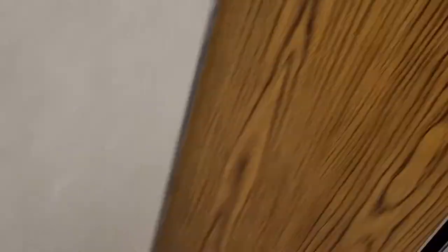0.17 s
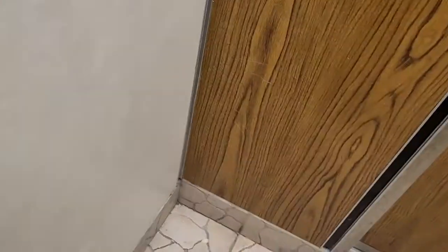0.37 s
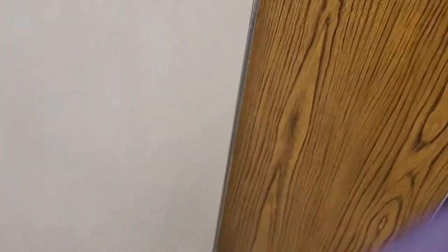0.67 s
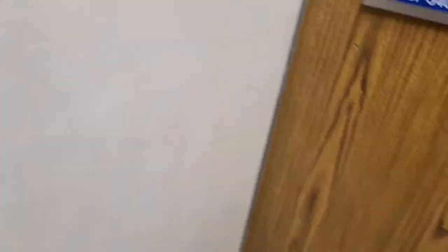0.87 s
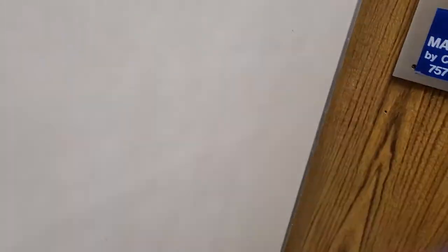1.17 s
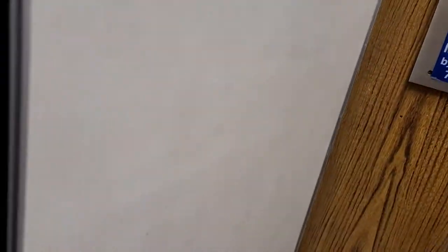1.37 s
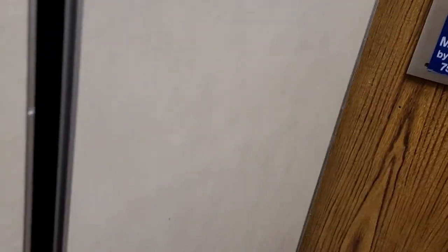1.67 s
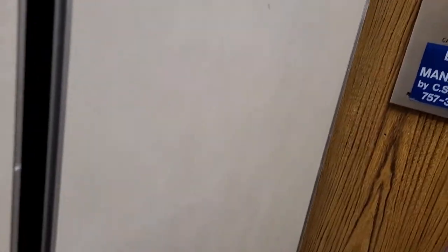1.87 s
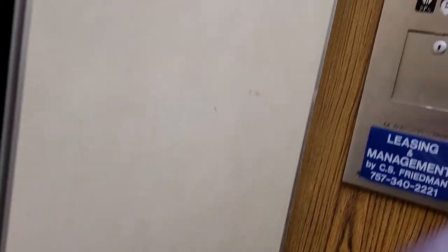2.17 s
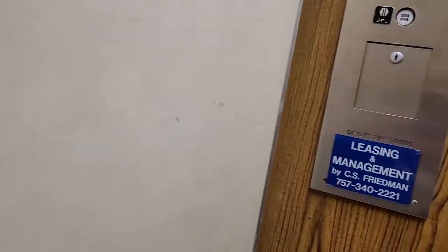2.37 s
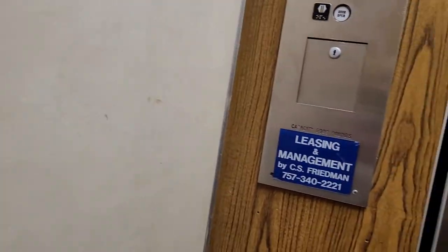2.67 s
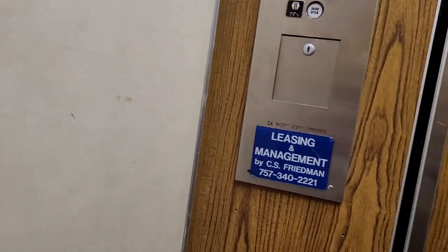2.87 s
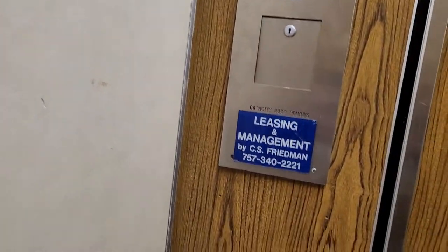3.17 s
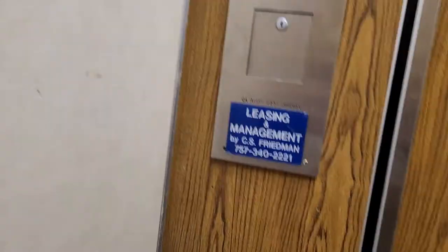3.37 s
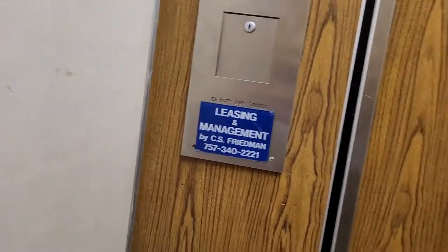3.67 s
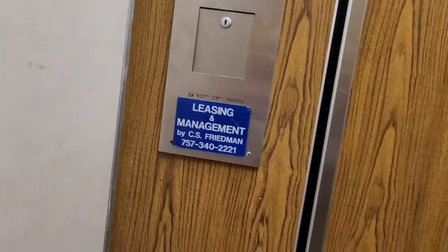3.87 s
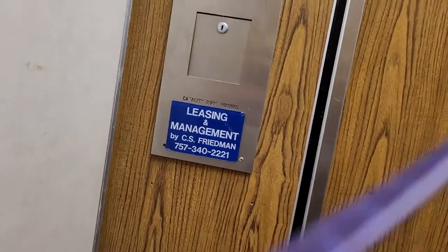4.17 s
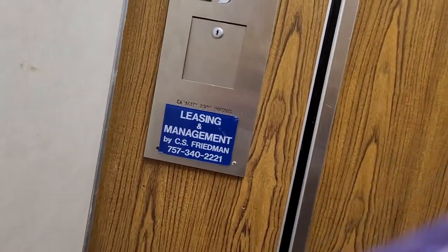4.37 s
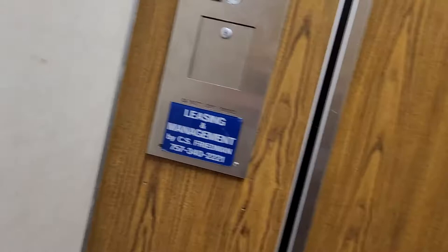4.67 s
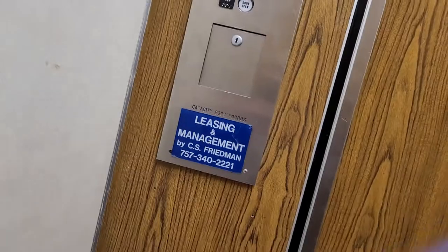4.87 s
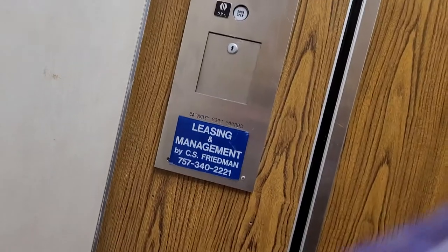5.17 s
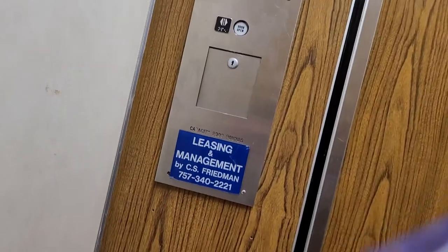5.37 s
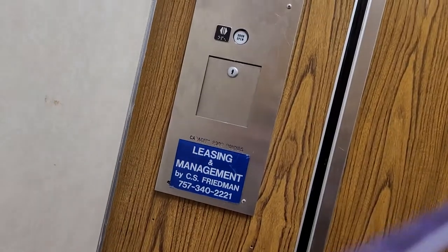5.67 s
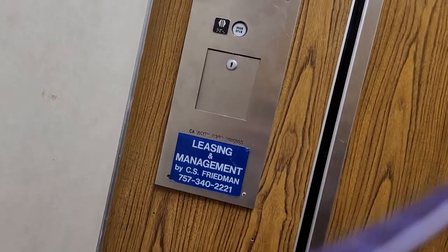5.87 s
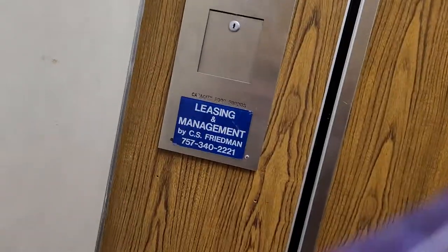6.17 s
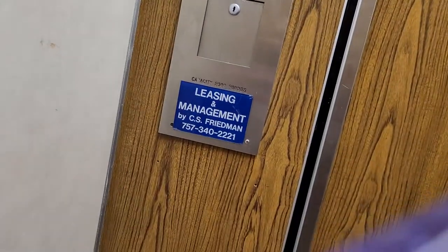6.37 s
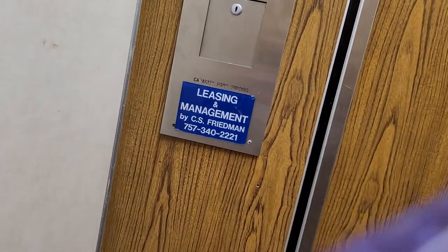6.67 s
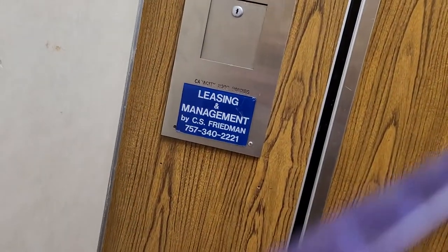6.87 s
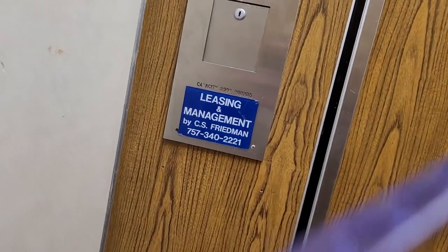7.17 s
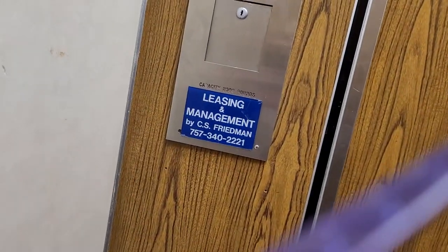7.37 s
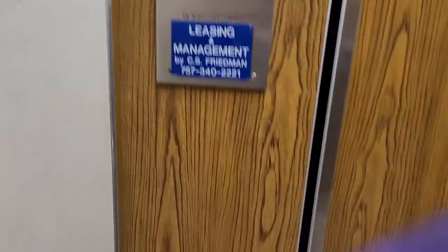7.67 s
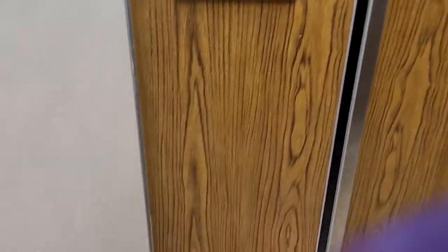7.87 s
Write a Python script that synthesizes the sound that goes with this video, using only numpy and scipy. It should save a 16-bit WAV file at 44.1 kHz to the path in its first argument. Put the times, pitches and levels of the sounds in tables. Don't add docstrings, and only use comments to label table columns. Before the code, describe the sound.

A lift door closes within arm's reach: rough low rumble, scraping, bright clicks and boxy thuds, with a dry squeaking roller. The clatter is busiest in the first two and a half seconds, ends with a firm knock, then rolls out in small bumps and ticks. A long quiet stretch holds only low hum and tiny taps before a fast toothed catch zips close to the left. Stereo phone, short boxy echo, strap rustle.

```python
import sys
import numpy as np
from scipy import signal
from scipy.fft import rfft, irfft
from scipy.io import wavfile
from scipy.ndimage import uniform_filter1d

SR = 44100
rng = np.random.default_rng(int(sys.argv[2]) if len(sys.argv) > 2 else 0)


def wrap_up_sound(samples):
    columns = np.atleast_2d(samples).T
    tamed = np.clip(columns, -1, 1)
    steps = np.round(tamed * 32767).astype(np.int16)
    wavfile.write(sys.argv[1], SR, steps)


def gain_from_db(level_db):
    decades = np.asarray(level_db, float) / 20
    return 10 ** decades


N = 353682


def band(x, lo_hz, hi_hz, order=2):
    return signal.sosfilt(signal.butter(order, [lo_hz, min(hi_hz, .45 * SR)], "bandpass", fs=SR, output="sos"), x)


def unit(x):
    return x / np.sqrt(np.mean(x ** 2))


def ring(x, hz, t60):
    pole = np.exp(2j * np.pi * hz / SR - np.log(1000) / (max(t60, .01) * SR))
    return signal.lfilter([1], [1, -pole], x).imag


def walk(rate):
    k = int(SR / rate)
    steps = np.repeat(rng.standard_normal(N // k + 1), k)
    return unit(uniform_filter1d(uniform_filter1d(steps, k), k)[:N])


def coloured(points, channels=2):
    hz, db = np.transpose(points)
    gain = gain_from_db(np.interp(np.log(np.fft.rfftfreq(N, 1 / SR) + 1), np.log(hz), db))
    return unit(irfft(rfft(rng.standard_normal((channels, N))) * gain, N))


def curve(table):
    s, db = np.transpose(table)
    return gain_from_db(np.interp(np.arange(N) / SR, s, db))


def swells(s, db, rise, fall):
    t = np.linspace(0, N / SR, num=4096)[:, None]
    climb = (s - t) / np.maximum(rise, .01)
    sink = (t - s) / np.maximum(fall, .01)
    gain = gain_from_db(db - 20 * np.maximum(climb, sink)).sum(axis=1)
    return np.interp(np.arange(N) / SR, t[:, 0], gain)


def evened(x):
    spectrum = rfft(x)
    power = uniform_filter1d(np.abs(spectrum) ** 2, size=5)
    return irfft(spectrum / np.sqrt(power), x.shape[-1])


def add(out, s, sound):
    i = int(s * SR)
    out[..., i:i + sound.shape[-1]] += sound[..., :N - i]


def ports(mid, side):
    return np.array([mid + side, mid - side])


def panned(sound, db, pan_db):
    return gain_from_db(db + np.array([[pan_db], [-pan_db]]) / 2) * sound


def motor_hum():
    # line in Hz, level in dB rms.
    hum_lines = [(59, -83), (119, -76.5), (177, -78.5), (240, -80.5), (283, -81.5)]
    # frequency in Hz, density in dB per Hz.
    still_air = [(15, -31), (25, 2.5), (97, -14), (134, 5), (212, -6.5), (270, -0.5), (516, -21),
                 (714, -20), (1100, -38), (1330, -49), (8360, -38), (14800, -40), (16000, -43.5)]
    t = np.arange(N) / SR
    hum = np.zeros(N)
    for hz, db in hum_lines:
        level = gain_from_db(db + 4 + 1.8 * walk(6.7))
        hum += level * np.sin(2 * np.pi * hz * t + 0.54 * walk(3.3))
    return ports(hum, .2 * hum) + gain_from_db(-73.5) * coloured(still_air)


def strap():
    # peak in seconds, peak level in dB, seconds to rise 20 dB, seconds to fall 20 dB.
    brushes = [(0, -70.5, .1, 0.7), (.62, -68, 0.33, 0.86), (1.38, -52.5, 0.04, 0.08), (1.52, -79, -1, 1),
               (1.83, -73.5, 0.2, 0.5), (2.01, -70.5, 0.3, 0.22), (2.389, -60.5, -0.09, .12),
               (3.1, -54.5, 0.07, -0.02), (3.46, -81.5, 0.33, 0.67), (4.51, -76, 0.32, 0.35),
               (4.97, -82, -0.4, -0.05), (5.3, -84, 0.37, 0.5), (5.46, -77.5, 0.46, 0.85),
               (6.25, -83.5, 0.6, 0.5), (7.21, -79, 0.3, 0.4), (7.774, -56.5, 0.1543, -0.14),
               (8.02, -71.5, 0.28, .1)]
    # frequency in Hz, density in dB per Hz.
    fabric = [(900, -27.5), (1600, -8.5), (2600, -12), (4200, -2.5), (6000, -3.5), (7300, 1), (9000, -6.5),
              (12500, -5.5), (16000, -11)]
    return swells(*np.transpose(brushes)) * gain_from_db(7 + 1.1 * walk(22)) * coloured(fabric)


def car_body(force):
    # frequency in Hz, level in dB, t60 in seconds.
    modes = [(118, -3.5, 0.91), (147.46, -8, 0.53), (179.4, -9, 0.44), (237.8, -7.5, 0.29), (266, -5, 0.25),
             (284.4, -3, 0.32), (308, -5.5, 0.24), (349.4, -6.5, 0.13), (393.3, -6.5, 0.14),
             (421.5, -8.5, 0.24), (468, -8, 0.15), (498.6, -9, 0.18), (557, -16.5, 0.48),
             (614, -15.5, 0.032)]
    rings = np.array([gain_from_db(db) * ring(force, hz, t60) for hz, db, t60 in modes])
    side_db = -15.5
    lean = gain_from_db(side_db) * (0.71 + np.array(modes)[:, 0] / 200 * (-1) ** np.arange(len(modes)))
    return ports(rings.sum(axis=0), lean @ rings)


def door_travel():
    # time in seconds, rumble in dB.
    travel = [(0, -37), (.24, -49.5), (.46, -73), (.76, -40), (1.14, -53.5), (1.25, -40), (1.6, -51.5),
              (2.1, -50), (2.52, -47), (2.9, -87), (3.0, -57.5), (3.42, -62.5), (4.05, -73), (4.3, -64.5),
              (4.87, -71), (6.1, -66.5), (6.8, -75.5), (8.02, -74.5)]
    # time in seconds, level in dB.
    sway = [
        (0, -58.5),
        (2.3, -55),
        (2.78, -60),
        (2.97, -70),
        (3.2, -56),
        (4.55, -68.5),
        (4.75, -76.5),
        (5.85, -85),
        (6.95, -72.5),
        (8.02, -80.5),
    ]
    # peak in seconds, rumble in dB, lurch relative to it in dB,
    # scrape relative to it in dB, seconds to fall 20 dB.
    shudders = [(.1, -51.5, -24, -19.5, 1), (.54, -52, -15, -13, 0.35), (1.364, -33.5, -14, -12, 0.0648),
                (1.631, -50, -14, -15.5, -0.8), (1.799, -31, -7, -17.5, 0.1558),
                (1.92, -37, -17, -30.5, 0.35), (2.391, -36, -20.5, -9, 0.01), (2.74, -59.5, -5, -32, 0.17),
                (3.089, -35.5, -4.5, -11, 0.0075), (3.6, -57.5, -13, -18, 0.21),
                (4.57, -62, -11, -15, 0.13), (5.65, -71, -12, -13, 0.36), (6.17, -74.5, -16, -13, 0.5),
                (7.62, -73.5, -14, 3, 0.3), (7.76, -63, -16, 10, 0.08), (7.99, -79.5, -14, 0, 1)]
    rise = 0.09
    pivot_db, scrape_rel_db, scrape_slope = -60, -21.5, 0.93
    effort = curve(travel)
    s, db, lurch_db, scrape_db, fall = np.transpose(shudders)
    rumble = effort + swells(s, db, rise, fall)
    deep = curve(sway) + swells(s, db + lurch_db, rise, fall)
    scrape = gain_from_db(pivot_db + scrape_rel_db) * (effort / gain_from_db(pivot_db)) ** scrape_slope
    scrape = scrape + swells(s, db + scrape_db, rise, fall)

    noise = rng.standard_normal((4, N))
    lumps = noise[2:] * gain_from_db(2.8 * walk(45))
    shake = 0.751 * car_body(lumps[0]) + 22 * ports(lumps[1], 0.82 * lumps[0])
    shake = rumble * unit(band(shake, 100, 480, order=3))
    lurch = ports(noise[0], -.2 * noise[0] + 0.2 * noise[1])
    lurch = deep * unit(band(lurch, 11.0, 62))
    grit = scrape * gain_from_db(2 * walk(30)) * unit(band(rng.standard_normal((2, N)), 320, 2000))
    return gain_from_db(-2.0) * shake + gain_from_db(2.5) * lurch + gain_from_db(5.5) * grit


def clicks():
    # start in seconds, treble peak in dB, middle relative to treble in dB,
    # top relative to treble in dB, rattle length in seconds.
    latches = [(0.0558, -29, -4.5, -15, 0.0029), (0.1288, -30, -3, -27.5, 0.0081),
               (0.4152, -26.5, -5.5, -16, 0.0032), (0.7037, -26.5, -4, -9.5, 0.0015),
               (1.201, -52.5, 1, -21.5, 0.0051), (1.214, -48, 6, -23, 0.014),
               (1.246, -44.5, 6, -20, 0.0029), (1.2582, -22, -4.5, -11, 0.0023),
               (1.342, -24.5, -14, -20, 0.0023), (1.3816, -29, 0.5, -24, 0.0075),
               (1.595, -52, 1.5, -4, 0.0095), (1.722, -29, -2.5, -22, 0.017),
               (1.777, -35.5, 5.5, -27, 0.0052), (1.961, -41, -20, -17, 0.0074),
               (2.1645, -50, 6, -12, 0.021), (2.268, -53.5, -10, -21, 0.013),
               (2.31, -37.5, 6.5, -36, 0.0095), (2.357, -42, 14, -8, 0.0093),
               (2.941, -52.5, -2.5, -30, 0.004), (2.9655, -46, -16, -5.5, 0.015),
               (3.014, -47, 0, -6, 0.0098), (3.039, -22, -6.5, -12, 0.0035), (3.079, -36, 6, -25, 0.018),
               (3.384, -56, 3.5, -17, 0.034), (4.552, -63.5, -5, -2, 0.0047), (7.583, -66.5, 7, -19, 0.009)]
    out, t = np.zeros((2, N)), np.arange(4096) / SR
    for s, db, mid_db, top_db, length in latches:
        ticks = rng.standard_normal((3, len(t))) * gain_from_db(4.06 * rng.exponential(size=len(t)))
        ticks[:, :12] *= 4
        ticks = evened(ticks * np.exp(-t / max(length, .0005)))
        ticks = ticks * np.exp(-t / max(3 * length, .002))
        ticks = ticks / np.sqrt(np.sum(ticks ** 2))
        treble = unit(band(ticks[0], 2160, 8440)) / 200
        middle = unit(band(ticks[1], 300, 2680)) / 200
        top = unit(band(ticks[2], 6170, 17000)) / 200
        tone = treble + gain_from_db(mid_db + 1) * middle + gain_from_db(top_db + 4.0) * top
        add(out, s, panned(tone, db + 25.0, 0.1))
    return out


def knocks():
    # start in seconds, peak in dB, centre in Hz, deep part relative in dB, push length in seconds.
    pushes = [(0.056, -40.5, 289, -29, 0.02), (0.136, -40.5, 283, -17, 0.015),
              (0.425, -30, 123, -10, 0.013), (0.469, -32, 367, -16, 0.017), (0.722, -21, 300, -23.5, 0.02),
              (0.724, -28.5, 413, -25, 0.022), (0.728, -23.5, 116.4, -25, 0.01),
              (0.979, -42, 109, -15, 0.0038), (1.162, -43, 300, -18.5, .02),
              (1.272, -28, 126, -19.5, 0.0088), (1.35, -34, 118, -20, 0.015),
              (1.394, -31.5, 118, -20.5, 0.01), (1.754, -29.5, 266, -9, 0.01),
              (1.789, -20.5, 179, -16, 0.025), (1.762, -28, 416, -20, .003), (1.781, -30.5, 400, -20, .004),
              (1.803, -28.5, 330, -20, .008), (1.81, -27, 125, -19, 0.012), (1.951, -32.5, 118, -19, 0.01),
              (2.204, -39, 283, -21, 0.0037), (2.31, -32, 110, -20, 0.0071),
              (2.372, -29, 206.5, -23, 0.014), (2.958, -34, 106, -8, 0.029),
              (3.048, -27.5, 340, -7.5, 0.01), (3.073, -36, 280, -12.5, 0.0081),
              (3.384, -36, 268, 3, 0.0047), (3.548, -42, 290, -20, .004), (3.591, -42.5, 290, -20, 0.0042),
              (3.694, -43, 291, -20, .004), (3.927, -45.5, 290, -20, .004), (4.262, -44, 300, -20, .004),
              (4.463, -47, 401, -20, .003), (4.789, -51, 242, -32, 0.0065), (7.74, -43, 242, -30, 0.01),
              (7.755, -51, 244, -40, 0.0036)]
    force, lurch, t = np.zeros(N), np.zeros(N), np.arange(8192) / SR
    for s, db, hz, deep_db, length in pushes:
        push = rng.standard_normal(len(t)) * np.exp(-t / max(length, .001))
        push = push / np.sqrt(np.sum(push ** 2))
        focus = band(push, hz / 1.17, hz * 1.116, order=1)
        focus = focus * 0.0044 * np.sqrt(hz / np.sum(focus ** 2))
        add(force, s, gain_from_db(db - 6.5) * (focus + 0.41 * push))
        add(lurch, s, gain_from_db(db + deep_db + 38.0) * band(push, 22, 70))
    return band(car_body(force), 110, 810, order=3) + ports(lurch, .2 * lurch)


def whine():
    # peak in seconds, peak level in dB, seconds to rise 20 dB, seconds to fall 20 dB, centre in Hz.
    squeals = [(.3, -76, .4, .2, 1985), (.93, -73, .1, .5, 2100), (1.0, -75, .3, .4, 2130),
               (1.08, -70, .25, .3, 2130), (1.16, -77, .3, .15, 2115), (1.46, -66, .17, .05, 2145),
               (1.79, -62, .12, .2, 2060), (1.97, -72, .4, .3, 2060), (2.171, -60, .01, .06, 1907),
               (2.47, -66, .25, .25, 2075), (2.58, -76, .3, .25, 2110), (2.68, -80, .3, .15, 2100),
               (2.86, -94, .2, .1, 2064), (3.4, -77, .02, .3, 2076), (3.55, -78, .2, .2, 2096)]
    s, db, rise, fall, hz = np.transpose(squeals)
    phase = 2 * np.pi * np.cumsum(np.interp(np.arange(N) / SR, s, hz)) / SR
    low = signal.butter(2, 60, fs=SR, output="sos")
    a = unit(signal.sosfilt(low, rng.standard_normal((2, N))))
    b = unit(signal.sosfilt(low, rng.standard_normal((2, N))))
    core = a * np.cos(phase) + b * np.sin(phase)
    halo = unit(band(rng.standard_normal((2, N)), 1950, 2330, order=3))
    return swells(s, db + 2, rise, fall) * (core + 0.7 * halo)


def track_ticks():
    # start in seconds, peak in dB, treble relative in dB, left minus right in dB.
    contacts = [(0.23, -48.5, 0, 1), (1.199, -50.5, -4, 0), (2.166, -42, -5, -9), (3.384, -48, -15.5, -8),
                (3.695, -45, -21, 2), (4.017, -64, -28.5, 0), (4.232, -44.5, -28, -5),
                (4.467, -43, -17.5, 1), (4.517, -44, -20, 2), (4.531, -52, -8, 0), (4.545, -59, -14, -2),
                (4.56, -44.5, -13.5, 2), (4.566, -52, -8, 0), (4.709, -56.5, -8.5, -5),
                (4.795, -47.5, -19.5, -6), (5.068, -59.5, -12.5, -13.5), (5.152, -60, -25, -3),
                (7.475, -74.5, -3, -7), (7.584, -57, -7, 2)]
    out, t = np.zeros((2, N)), np.arange(2048) / SR
    for s, db, treble_db, pan_db in contacts:
        blow = 0.65 * rng.standard_normal((2, len(t))) * np.exp(-t / 0.002)
        blow[:, 0] = 7
        thud = band(blow[0], 340, 870)
        edge = gain_from_db(treble_db - 1.5) * band(blow[1], 1100, 3700, order=1)
        add(out, s, panned(thud + edge, db + 6, pan_db))
    return out


def taps():
    # start in seconds, peak in dB, pitch in Hz, t60 in seconds.
    hollow_taps = [(2.311, -45, 3930, 0.09), (2.48, -73.5, 4050, 0.57), (2.937, -59, 3830, 0.24),
                   (2.957, -56.5, 3840, 0.21), (.986, -52.5, 680, 0.15), (5.069, -76.5, 1590, 0.38),
                   (5.088, -77, 1800, 0.15), (5.075, -78.5, 950, 0.22), (5.133, -67.5, 1000, 0.062),
                   (5.152, -60, 950, 0.031), (5.165, -75, 990, 0.17), (5.631, -70, 934, 0.14),
                   (5.934, -73, 680, .12), (6.038, -70.5, 1630, 0.23), (6.069, -73.5, 1180, 0.13),
                   (4.232, -65, 715, 0.83), (6.15, -72.5, 468, 0.73), (7.043, -82, 917, 0.072),
                   (7.381, -85, 970, .1), (7.481, -80, 980, 0.54), (7.585, -60, 2770, 0.14),
                   (7.701, -52, 930, 0.09), (7.736, -51, 925, 0.13), (7.805, -58, 910, 0.11)]
    spread_hz, scuff_db, scuff_fade_hz = 120, -4, 1700
    out, t = np.zeros(N), np.arange(SR // 2) / SR
    for s, db, hz, t60 in hollow_taps:
        noise = rng.standard_normal((2, len(t)))
        tap = unit(band(noise[0], hz - spread_hz, hz + spread_hz))
        scuff = unit(band(noise[1], hz / 1.8, hz * 1.2))
        tap = tap + gain_from_db(scuff_db) * min(scuff_fade_hz / hz, 1) ** 2 * scuff
        add(out, s, gain_from_db(db - 60 * t / max(t60, .01)) * tap)
    return np.array([out, out])


def rail_judder():
    # start in seconds, peak in dB.
    hits = [
        (1.7198, -49),
        (1.7245, -40.5),
        (1.735, -43.5),
        (1.746, -42),
        (1.757, -48),
        (1.779, -47),
        (1.794, -47),
        (2.345, -50),
        (2.356, -55),
    ]
    # frequency in Hz, level in dB, t60 in seconds.
    rail_modes = [(2065, 6.5, .075), (2115, 6, 0.096), (2360, -5, .06), (2790, -3.5, .07), (3105, -9, .06),
                  (4650, -14, 0.045), (7000, -15, .05), (10430, -14.5, .05)]
    out, t = np.zeros(N), np.arange(SR // 2) / SR
    onset = np.minimum(t / .001, 1)
    for s, hit_db in hits:
        for (hz, db, t60), turn in zip(rail_modes, rng.random(len(rail_modes))):
            tone = np.sin(2 * np.pi * (hz * t + turn)) * onset
            add(out, s, gain_from_db(hit_db + db - 60 * t / t60) * tone)
    return np.array([out, out])


def roller():
    # time in seconds, level in dB.
    rolling = [
        (3.15, -36),
        (3.2, -49),
        (3.73, -46),
        (4.016, -51.5),
        (4.458, -54.5),
        (4.543, -50),
        (4.754, -69),
        (4.793, -62),
        (4.95, -87),
    ]
    # frequency in Hz, level in dB, t60 in seconds.
    mount_modes = [(142.9, -1.5, 0.16), (184.5, -11, 0.33), (280, 2.5, 0.08), (330, -7, 0.1),
                   (446.8, -12.5, 0.099), (554, -21.5, 0.087)]
    bumps_per_s = 22
    s, db = np.transpose(rolling)
    chance = rng.standard_normal((60, 2))
    force, t = 0.23 * rng.standard_normal(N), np.arange(2048) / SR
    starts = s[0] + np.cumsum(1 + .2 * chance[:, 0]) / bumps_per_s
    for start, size in zip(starts, chance[:, 1]):
        add(force, start, gain_from_db(1.45 * size) * rng.standard_normal(len(t)) * np.exp(-t / .008))
    sound = sum(gain_from_db(gain_db) * ring(force, hz, t60) for hz, gain_db, t60 in mount_modes)
    gain = gain_from_db(np.interp(np.arange(N) / SR, s, db, left=-120, right=-120))
    loudness = np.std(sound[int(s[0] * SR):int(s[-1] * SR)])
    return gain * band(ports(sound, 0.3 * np.roll(sound, 40)), 100, 560, order=4) / loudness


def ratchet():
    # start in seconds, peak in dB.
    teeth = [(7.6795, -26), (7.6822, -18), (7.6898, -16.5), (7.6982, -16), (7.706, -15.5), (7.7135, -18.5),
             (7.7214, -20), (7.7293, -20), (7.738, -21.5), (7.7461, -21.5), (7.7534, -25), (7.761, -26),
             (7.769, -27), (7.777, -30), (7.786, -31), (7.797, -33), (7.81, -34), (7.825, -34)]
    # low edge in Hz, high edge in Hz, level in dB.
    tooth_bands = [(750, 1160, -3), (1150, 3350, -5.5), (3920, 6400, 4), (6470, 8600, 1.5),
                   (8550, 15000, 2)]
    snaps, t = np.zeros(N), np.arange(256) / SR
    for s, db in teeth:
        chatter = .22 * rng.standard_normal(len(t)) * np.exp(-t / .002)
        chatter[0] = 1
        add(snaps, s, gain_from_db(db + 3.5) * chatter)
    sound = np.zeros(N)
    for k, (lo_hz, hi_hz, db) in enumerate(tooth_bands):
        sound += (-1) ** k * gain_from_db(db) * band(snaps, lo_hz, hi_hz, order=4)
    return np.array([sound, gain_from_db(-7) * np.roll(sound, int(.0008 * SR))])


def car_echo(dry):
    # band centre in Hz, t60 in seconds.
    car_t60 = [(750, 0.39), (1500, 0.25), (3000, 0.25), (6000, 0.24), (12000, 0.2)]
    early_span_s, early_db, tail_db, direct_db = .014, -6, -18.5, -2
    t = np.arange(SR // 2) / SR
    noise = rng.standard_normal((2, len(t)))
    tail = sum(band(noise, hz / np.sqrt(2), hz * np.sqrt(2)) * gain_from_db(-60 * t / t60) for hz, t60 in car_t60)
    tail = tail * (1 - np.exp(-t / .002)) * gain_from_db(tail_db - 1.5)
    for place, size in rng.random((10, 2, 2)):
        tail[[0, 1], (place * early_span_s * SR).astype(int)] += gain_from_db(early_db) * (2 * size - 1)
    tail[:, 0] += gain_from_db(direct_db) * np.array([1, -1])
    spectrum = rfft(tail)
    power = np.abs(spectrum) ** 2
    level = np.sqrt(uniform_filter1d(power, size=2500) / uniform_filter1d(power, size=200))
    tail = irfft(spectrum * level)[:, :SR // 3]
    return signal.fftconvolve(dry, tail, axes=1)[:, :N]


def scene():
    hum, rustle = motor_hum(), strap()
    door = door_travel() + knocks() + whine() + roller()
    ticks, tapped, teeth = track_ticks(), taps() + rail_judder(), ratchet()
    wet = clicks() + gain_from_db(-6) * ticks + gain_from_db(-6.0) * tapped + gain_from_db(-7.5) * teeth
    return hum + rustle + door + ticks + tapped + teeth + car_echo(wet)


def top_cut(x):
    return signal.sosfilt(signal.butter(12, 16520, fs=SR, output="sos"), x)


def record(dry):
    x = signal.sosfilt(signal.butter(2, 18, "highpass", fs=SR, output="sos"), dry)
    x = signal.sosfilt(signal.ellip(8, .2, 60, 15900, fs=SR, output="sos"), x)
    return top_cut(x)


dry = scene()
out = record(dry)
wrap_up_sound(out)
```